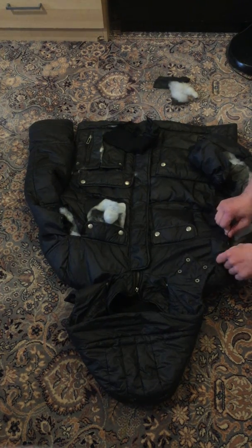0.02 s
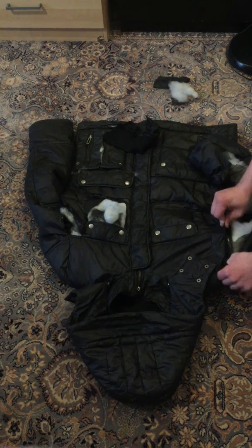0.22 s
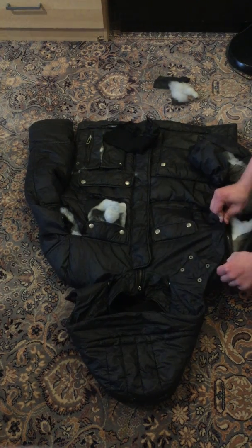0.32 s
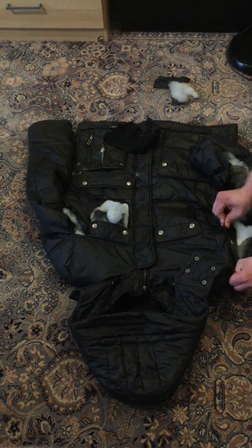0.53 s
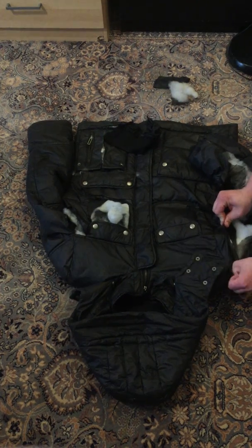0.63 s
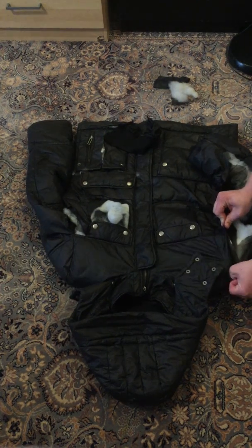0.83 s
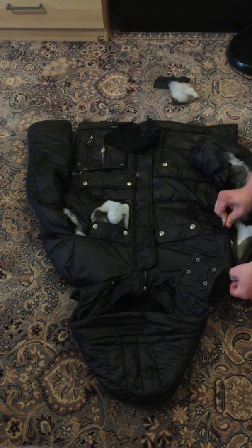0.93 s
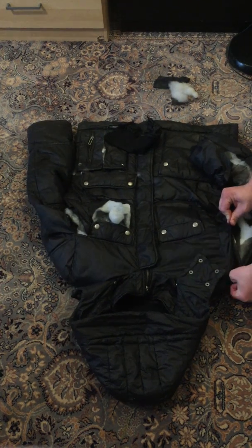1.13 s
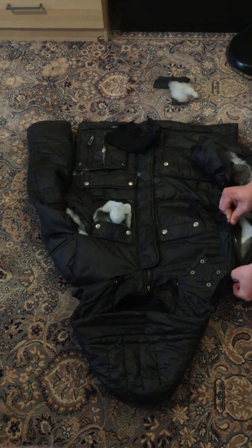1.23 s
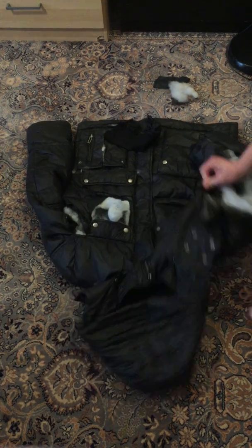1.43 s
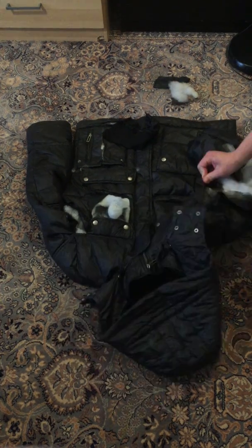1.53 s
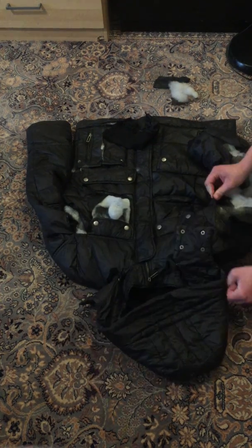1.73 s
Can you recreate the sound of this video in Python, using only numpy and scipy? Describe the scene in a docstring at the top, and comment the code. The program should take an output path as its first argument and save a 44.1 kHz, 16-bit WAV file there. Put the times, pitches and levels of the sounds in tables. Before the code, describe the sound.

Tearing nylon fabric: quick harsh rip, slowing thread snaps, sparse stitch pops, one last sharp tear

```python
"""Tearing nylon: hands rip the shell of a quilted jacket on the carpet of a small room.
A fast rip slows to single snapping threads, a few seam stitches pop, and a last short rip frees the cloth.
Dense random clicks make the rip and its rasp; short bursts, shaped by colour filters, make snaps and pops.
Damped low puffs are the flapping cloth and soft click grains its rustle, with a short room and a quiet floor."""
import sys
import numpy as np
from scipy import signal
from scipy.fft import rfft, irfft
from scipy.io import wavfile

SR = 44100
rng = np.random.default_rng(int(sys.argv[2]) if len(sys.argv) > 2 else 0)


def digitize_waveform(pressure):
    """Quantize a signal to 16-bit integers and store it at the path in sys.argv[1].

    Rows of a 2-D input are taken as channels; values are limited to [-1, 1].
    """
    field = np.atleast_2d(pressure).T
    bounded = np.clip(field, -1, 1)
    quanta = np.round(bounded * 32767).astype(np.int16)
    wavfile.write(sys.argv[1], SR, quanta)


N = 77175  # length [samples], 1.75 s


def amp(db):
    """Decibels to gain."""
    return 10 ** (np.asarray(db) / 20)


def unit(x):
    """Scales to energy 1."""
    return x / np.sqrt(np.sum(x ** 2) + 1e-20)


def read(points, hz):
    """Reads a table of values over frequency, interpolated on a log-frequency axis."""
    f, value = np.transpose(points)
    return np.interp(np.log(hz + 1), np.log(f + 1), value)


def level(points):
    """Gain over time from a dB curve, practically silent before and after it."""
    s, db = np.transpose(points)
    return amp(np.interp(np.arange(N) / SR, s, db, left=-140, right=-140))


def add(mix, s, sound):
    """Adds a sound to the mix at a time in seconds, cut off at the end of the mix."""
    part = mix[round(s * SR):][:len(sound)]
    part += sound[:len(part)]


def colour(x, points, size=4096):
    """Minimum-phase filter of energy 1: the table sets the spectral shape, not the overall level."""
    hz = abs(np.fft.fftfreq(size, 1 / SR))
    log_gain = np.log(amp(read(points, hz)))
    min_phase = np.exp(np.conj(signal.hilbert(log_gain)))
    response = np.fft.ifft(min_phase).real[:size // 2]
    return signal.fftconvolve(x, unit(response))[:N]


def snap(fray, decay_s, even=1, size=300):
    """One sharp break, then the quick fraying of its filaments; even = 1 flattens its spectrum."""
    decay = np.exp(-np.arange(size) / SR / decay_s)
    burst = fray * unit(rng.standard_normal(size) * decay)
    burst[0] = 1  # the break itself
    spectrum = rfft(burst, 2 * size)
    evened = spectrum / (abs(spectrum) + 1e-9) ** even
    return unit(irfft(evened)[:size])


def crackle(per_s, spread_db):
    """Random tiny clicks of uneven size and either polarity, rms 1."""
    size = amp(spread_db * np.minimum(rng.exponential(1, N), 3))
    polarity = rng.choice([-1., 1.], N)
    clicks = size * polarity * (rng.random(N) < per_s / SR)
    return unit(clicks) * np.sqrt(N)


# Spectrum of the quiet floor: (frequency [Hz], relative level [dB])
FLOOR_COLOUR = [(20, -33), (33, -5), (47, 1), (65, -8), (110, -4), (200, -17.5), (600, -22), (2000, -40),
                (6000, -20.5), (17000, -31)]
FLOOR_DB = -69.5


def quiet_floor():
    """Steady noise, strongest in the bass."""
    return amp(FLOOR_DB) * colour(rng.standard_normal(N), FLOOR_COLOUR)


# Spectral balance of the room's tail: (frequency [Hz], level [dB])
ROOM_LEVEL = [(100, -8.5), (400, -3), (2400, 0.5), (5500, -7.5), (14000, -11.5)]
# Echoes off near surfaces; a negative gain flips the polarity: (time [s], gain)
ECHOES = [(.0024, 0.16), (.0056, 0.13), (.0069, -0.13), (0.0111, 0.12)]
ROOM_T60_S, ROOM_DULL_HZ = 0.28, 13500  # decay time in the bass; pitch at which it has halved


def room(x, gap_s=.004, build_s=0.0055):
    """A few near echoes over a short, gradually building diffuse tail whose treble dies first."""
    hz, t, noise = signal.stft(rng.standard_normal(SR // 2), SR, nperseg=256)
    t60 = ROOM_T60_S / (1 + hz[:, None] / ROOM_DULL_HZ)
    decay = amp(read(ROOM_LEVEL, hz)[:, None] - 60 * t / t60)
    even_energy = np.sqrt(2 * np.log(1000) / (t60 * SR))  # offsets the differing decay times
    tail = signal.istft(noise * decay * even_energy, SR, nperseg=256)[1]
    build = np.minimum(np.arange(len(tail)) / SR / build_s, 1)
    response = np.zeros(SR)
    add(response, gap_s, tail * build)
    for s, gain in ECHOES:
        add(response, s, gain * snap(fray=0.84, decay_s=0.00013))
    return x + signal.fftconvolve(x, response)[:N]


# Nylon sliding under the hands, before the random lumps: (time [s], level [dB])
RUSTLE = [(0, -67), (.05, -68.5), (.11, -72), (.2, -67), (0.498, -57.5), (0.792, -73), (.86, -66),
          (.96, -73), (1.11, -70), (1.3, -72.5), (1.389, -65), (1.55, -52), (1.62, -61), (1.674, -63.5),
          (1.695, -81), (1.719, -64), (1.745, -59)]
# Spectrum of the rustle: (frequency [Hz], relative level [dB])
RUSTLE_COLOUR = [(60, -36), (150, -8.5), (340, -0.5), (500, -8), (700, -2), (1050, -6), (1700, -4.5),
                 (3000, -6), (6000, -17.5), (10000, -21.5), (17000, -19)]
RUSTLE_PER_S, RUSTLE_SPREAD_DB = 2000, 3  # grain rate; unevenness
RUSTLE_LUMP_DB, RUSTLE_LUMP_S = 3.5, 0.016  # size and spacing of the random swells


def rustle():
    """Soft grains of nylon and filling, sliding in small fits and starts."""
    t = np.arange(N) / SR
    lumps = np.interp(t / RUSTLE_LUMP_S, np.arange(N), rng.standard_normal(N))
    gain = amp(np.interp(t, *np.transpose(RUSTLE)) + RUSTLE_LUMP_DB * lumps)
    return colour(crackle(RUSTLE_PER_S, RUSTLE_SPREAD_DB) * gain, RUSTLE_COLOUR)


# Loose cloth flapping and drumming as it gives way: (time [s], level [dB], pitch [Hz], rise [s])
FLAPS = [(.283, -12, 563, 0.0022), (.315, -6.5, 603, 0.0012), (.317, -10.5, 282, 0.0013),
         (.328, -32, 603, 0.0037), (.33, -24, 126, 0.0065), (.53, -19, 677, 0.0044),
         (.575, -18, 315, 0.0019), (.603, -22.5, 375, 0.0042), (.638, -21, 362, 0.0035),
         (.668, -17.5, 344, 0.0034), (.734, -30.5, 350, 0.0032), (.819, -26, 367, 0.0016),
         (1.422, -10.5, 278, 0.0026), (1.424, -11, 690, 0.0012), (1.433, -12, 968, 0.0041),
         (1.464, -16, 233, 0.0043), (1.469, -10.5, 250, 0.0038), (1.514, -22.5, 368, 0.0024),
         (1.59, -28.5, 294, 0.0014), (1.608, -29, 124, 0.0035)]


def flaps(noisy=0.49):
    """The freed cloth whips: a short, heavily damped low puff of tone and band noise."""
    out, t = np.zeros(N), np.arange(SR // 16) / SR
    for s, db, hz, rise_s in FLAPS:
        shape = t / rise_s * np.exp(-t / rise_s)
        tone = unit(shape * np.sin(2 * np.pi * hz * t))
        band = signal.butter(2, [hz * .5, hz * 1.77], "band", fs=SR, output="sos")
        air = unit(shape * signal.sosfilt(band, rng.standard_normal(len(t))))
        add(out, s, amp(db) * unit(tone + noisy * air))
    return out


# Seam stitches popping; the edges bound the crack:
# (time [s], crack level [dB], cloth recoil level [dB], low edge [Hz], high edge [Hz])
STITCHES = [(0.7309, -24, -45, 3000, 12000), (.8188, -9, -30, 2450, 6200), (.8925, -30, -50, 2790, 14000),
            (0.8936, -21, -52, 2800, 9200), (0.8955, -21, -53, 2740, 11100), (0.899, -25, -48, 2840, 12000),
            (0.9064, -18.5, -35.5, 2960, 9100), (0.9075, -27, -43, 2800, 8100),
            (0.9782, -28.5, -71, 3500, 10000), (0.9849, -23.5, -50, 3460, 8200),
            (.9898, -3.5, -14.5, 3240, 7750), (1.1502, -26.5, -45, 4000, 9000),
            (1.1765, -8, -32, 3570, 10200), (1.1781, -7.5, -14.5, 2360, 11500),
            (1.1827, -13, -22, 2800, 9050), (1.1899, -9, -53, 2880, 11100), (1.1924, -12, -26, 3000, 12300),
            (1.4035, -21, -41, 3260, 10000), (1.41, -8, -26, 3920, 9000), (1.412, -6, -17, 1470, 9000),
            (1.4259, -10, -15, 3030, 11000), (1.4338, -4, -12.5, 1330, 12100)]
# Spectra of the crack and of the recoil: (frequency [Hz], relative level [dB])
STITCH_COLOUR = [(150, -18), (1000, -28), (1700, 6), (2700, -4.5), (4000, -3), (5600, 2), (7700, -0.5),
                 (9500, -4), (11500, -7), (17000, 2)]
RECOIL_COLOUR = [(40, -27), (130, -1.5), (330, -1.5), (620, 5.5), (800, -0.5), (1000, -9.5), (1350, -3),
                 (1750, -9), (2200, -13), (8000, -50)]


def stitches():
    """Each stitch cracks in its own band and the cloth recoils with a low pop."""
    cracks, recoils = np.zeros(N), np.zeros(N)
    for s, crack_db, recoil_db, low_hz, high_hz in STITCHES:
        band = np.vstack([signal.butter(7, low_hz, "high", fs=SR, output="sos"),
                          signal.butter(1, high_hz, "low", fs=SR, output="sos")])
        crack = unit(signal.sosfilt(band, snap(fray=1.3, decay_s=0.00035)))
        add(cracks, s - .0002, amp(crack_db) * crack)  # just ahead of the recoil
        add(recoils, s, amp([recoil_db]))  # one click, made a pop by its colour
    return colour(cracks, STITCH_COLOUR) + colour(recoils, RECOIL_COLOUR)


# Threads of the weave snapping: (time [s], level [dB])
THREADS = [(0.224, -4.5), (0.2405, -13), (0.2836, -5), (0.3162, -13), (0.4272, -14.5), (.4295, -31),
           (0.439, -14.5), (.4446, -15.5), (0.4549, -14.5), (0.4626, -11.5), (0.468, -20), (0.4726, -19),
           (0.479, -27), (.4875, -19), (0.4924, -26), (0.5065, -28), (.5114, -20), (0.5153, -14.5),
           (0.52, -16), (0.5225, -10), (0.5281, -10), (0.5338, -8.5), (.5368, -15), (0.5416, -17),
           (0.5452, -8.5), (0.5505, -10), (0.5568, -16), (0.575, -7), (0.5797, -13), (0.589, -17),
           (0.5899, -22), (.604, -16.5), (0.6078, -19), (0.6259, -18), (0.6407, -10.5), (0.6445, -24),
           (0.6502, -26), (0.6552, -37), (0.6655, -28), (0.6686, -16), (0.6729, -14), (0.708, -34),
           (0.7346, -24), (0.7357, -20), (0.7416, -22), (1.0727, -28.5), (1.141, -29.5), (1.1544, -27),
           (1.172, -25), (1.238, -25), (1.4216, 0.5), (1.4274, -14), (1.4489, -13.5), (1.459, -14)]
# Ring of the stretched sheet against each snap: (time [s], level [dB])
TWANG = [(.22, -23.5), (.3, -5), (.42, 4.5), (.47, -5), (.52, -12.5), (.58, -20.5), (.66, -37), (.75, -37)]
# Top octave added to each snap: (time [s], level [dB])
SIZZLE = [(.22, -24), (.28, -13), (.45, -18), (.53, -22), (.575, -6), (.64, 2), (.68, -7), (.74, -12),
          (1.42, -18), (1.46, -3)]
# Spectra of the snap, the ring and the top octave: (frequency [Hz], relative level [dB])
THREAD_COLOUR = [(80, -39), (300, -2.5), (700, -11.5), (1050, -8.5), (1750, -3.5), (3300, -3.5),
                 (5500, 0.5), (8800, 0.5), (10400, -5), (13500, -2), (17000, 0)]
TWANG_COLOUR = [(200, -27), (1050, -10.5), (1450, -2), (1720, 3), (2150, 3.5), (2800, -3), (3600, -9),
                (9000, -22)]
SIZZLE_COLOUR = [(200, -45), (5000, -35), (10400, -2.5), (12500, 0), (16000, -7), (17000, 1)]


def threads():
    """Single threads snap, each with its own random fray, and twang the stretched sheet."""
    breaks = np.zeros(N)
    for s, db in THREADS:
        add(breaks, s, amp(db) * snap(fray=2.24, decay_s=0.00078, even=0.37))
    body = colour(breaks, THREAD_COLOUR)
    twang = colour(breaks * level(TWANG), TWANG_COLOUR)
    sizzle = colour(breaks * level(SIZZLE), SIZZLE_COLOUR)
    return body + twang + sizzle


# Fine crackle, one curve per running tear: (time [s], level [dB])
TEARS = [
    [(.225, -37.5), (.245, -38.5), (.277, -34), (.286, -31.5), (.305, -33), (.318, -24), (.33, -29),
     (.355, -31), (.372, -39), (.40, -48)],
    [(.42, -51), (.445, -43), (.485, -49), (.5, -52), (.535, -42), (.565, -56), (.595, -36.5), (.63, -54),
     (.68, -49), (.75, -70)],
    [(1.411, -33), (1.422, -34.5), (1.44, -32), (1.46, -34), (1.474, -39), (1.488, -53), (1.53, -59)],
]
# Rasp of the stretched sheet around the tear, one curve per stretch: (time [s], level [dB])
RASPS = [
    [(.225, -52), (.272, -43), (.286, -35), (.303, -33.5), (.32, -28.5), (.345, -37), (.38, -43.5),
     (.415, -51), (.45, -46), (.5, -45.5), (.55, -48.5), (.66, -49.5), (.75, -75)],
    [(1.41, -41), (1.422, -34), (1.445, -42.5), (1.475, -37), (1.49, -44), (1.55, -52.5), (1.6, -73)],
]
# Spectra of the crackle and of the rasp: (frequency [Hz], relative level [dB])
TEAR_COLOUR = [(80, -16.5), (300, -12), (900, -8.5), (2000, 0.5), (3500, -0.5), (4900, -1.5), (6200, 2.5),
               (8000, -5), (10300, -4), (12000, 0.5), (13400, -5), (15000, 1), (17000, -1.5)]
RASP_COLOUR = [(50, -20.5), (110, -13), (280, -10), (430, -6), (640, 0.5), (900, -6), (1250, -4),
               (1700, -1), (2500, -2.5), (3600, -7), (6000, -6), (11000, -12)]
THREADS_PER_S, THREAD_SPREAD_DB = 4200, 1.5  # click rate; unevenness
RASP_PER_S, RASP_SPREAD_DB = 2200, 3.5


def tearing():
    """Threads break in a run, thousands a second, and the sheet around them rasps."""
    fine = crackle(THREADS_PER_S, THREAD_SPREAD_DB) * sum(level(curve) for curve in TEARS)
    rasp = crackle(RASP_PER_S, RASP_SPREAD_DB) * sum(level(curve) for curve in RASPS)
    return colour(fine, TEAR_COLOUR) + colour(rasp, RASP_COLOUR)


LOW_CUT_HZ = 68


def scene():
    """The jacket's sounds with their deep bass cut, in the room over a quiet floor."""
    jacket = rustle() + flaps() + stitches() + threads() + tearing()
    low_cut = signal.butter(2, LOW_CUT_HZ, "high", fs=SR, output="sos")
    return (room(signal.sosfilt(low_cut, jacket)) + quiet_floor())[None]


EDGE_HZ = 17250


def record(dry):
    """The recorder's band limit: a steep low-pass with no delay."""
    low_pass = signal.firwin(511, EDGE_HZ, window=("kaiser", 8), fs=SR)
    return signal.oaconvolve(dry, low_pass[None], "same")


dry = scene()
out = record(dry)
digitize_waveform(out)
```